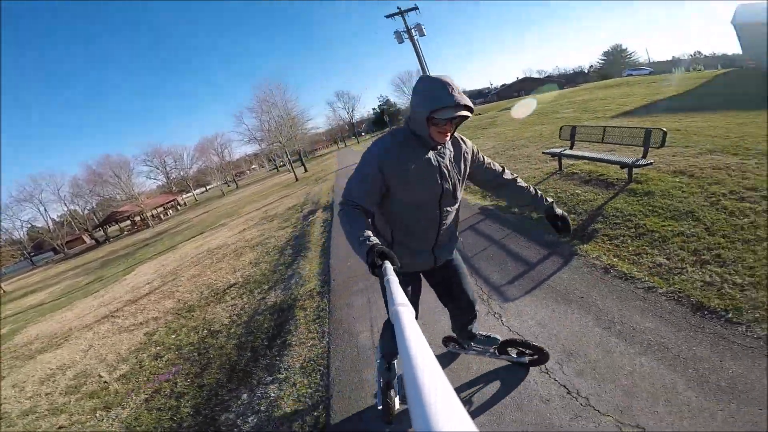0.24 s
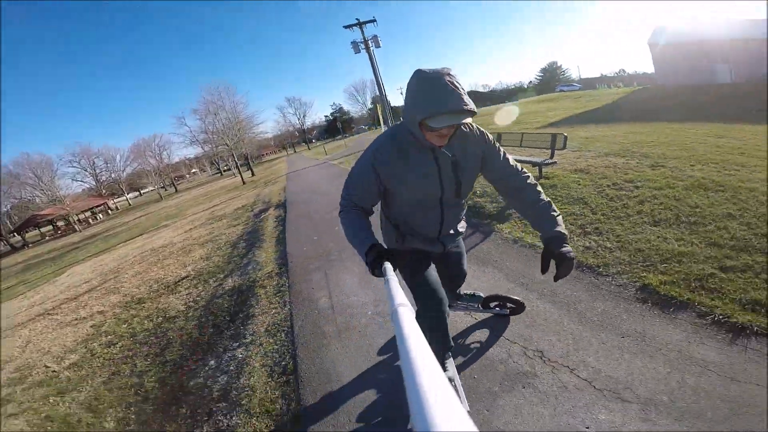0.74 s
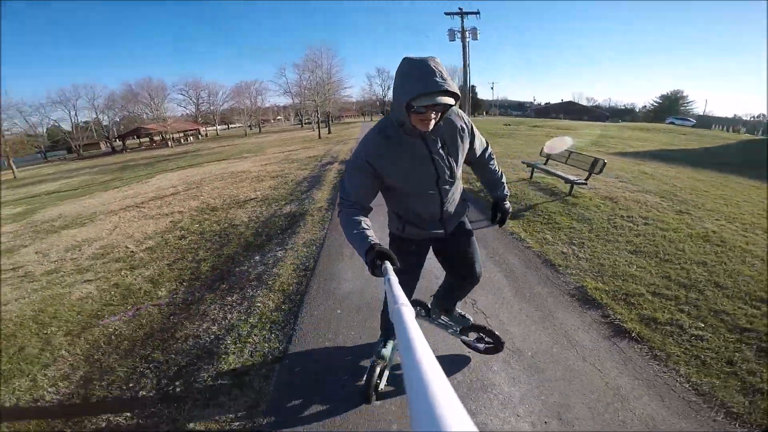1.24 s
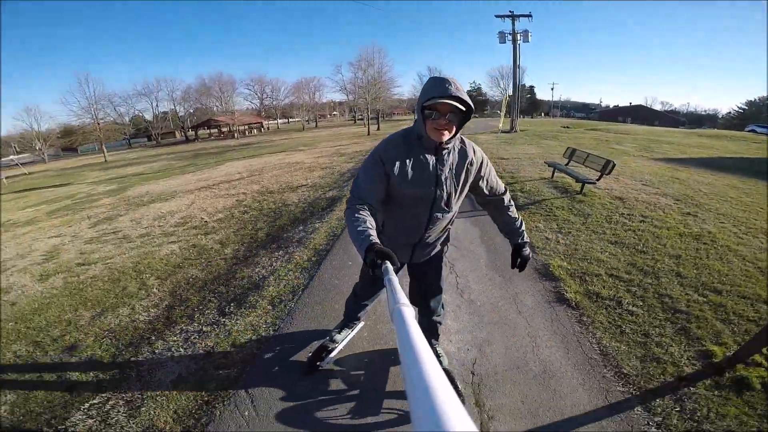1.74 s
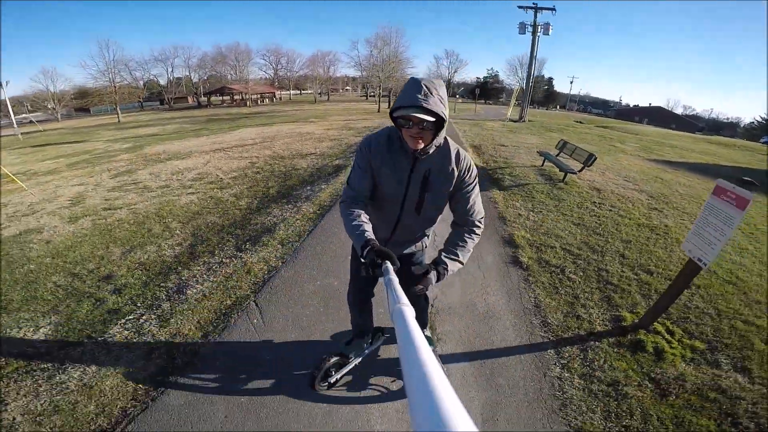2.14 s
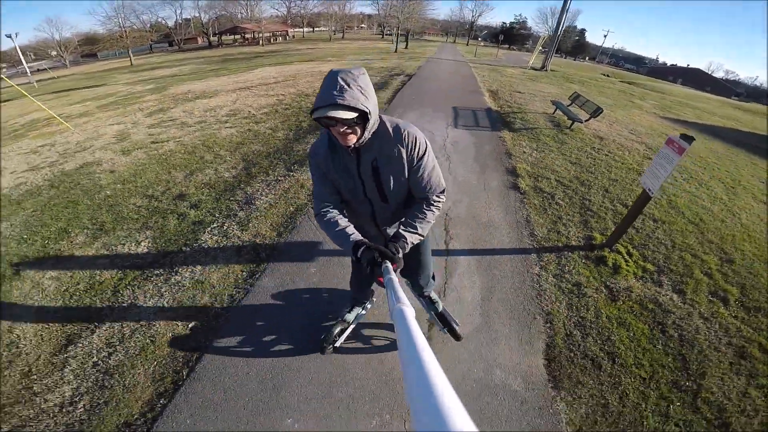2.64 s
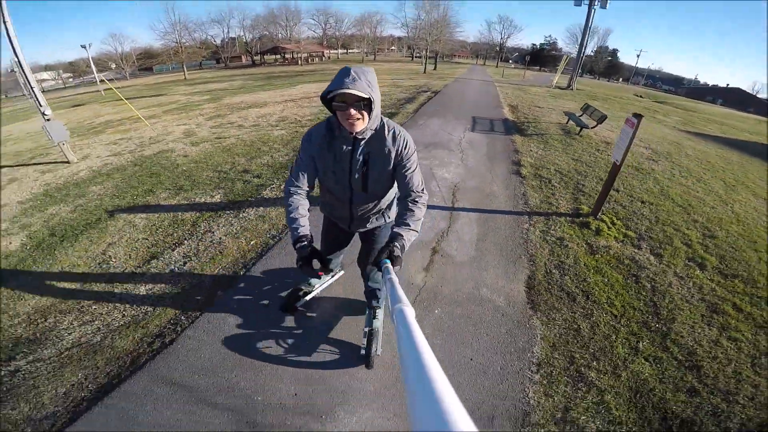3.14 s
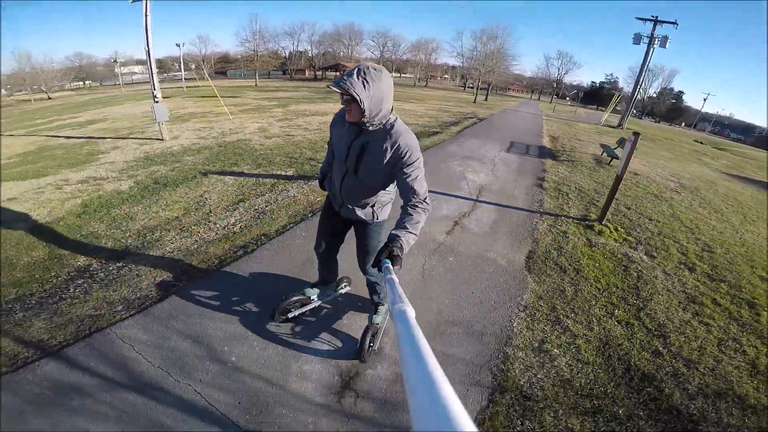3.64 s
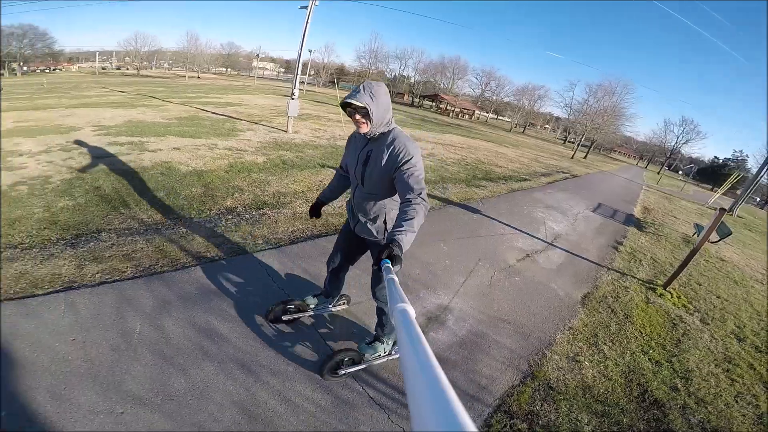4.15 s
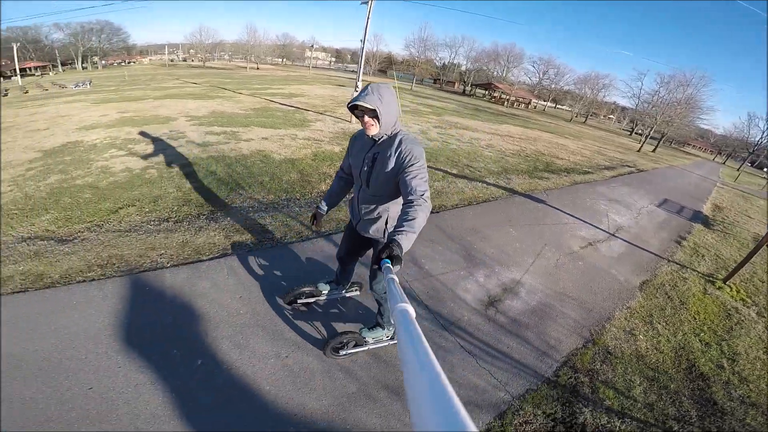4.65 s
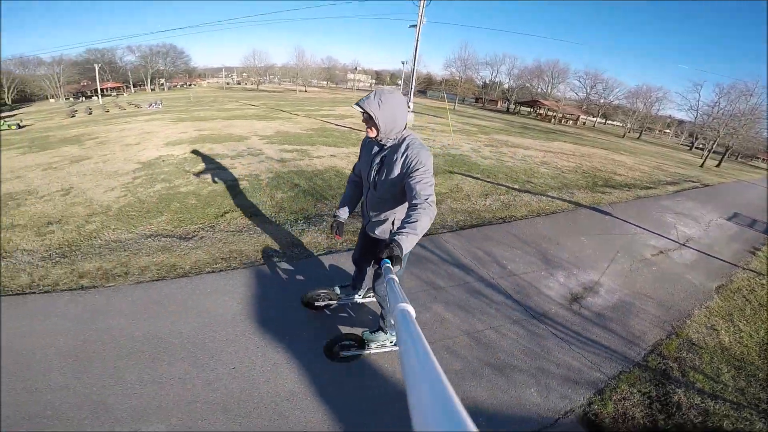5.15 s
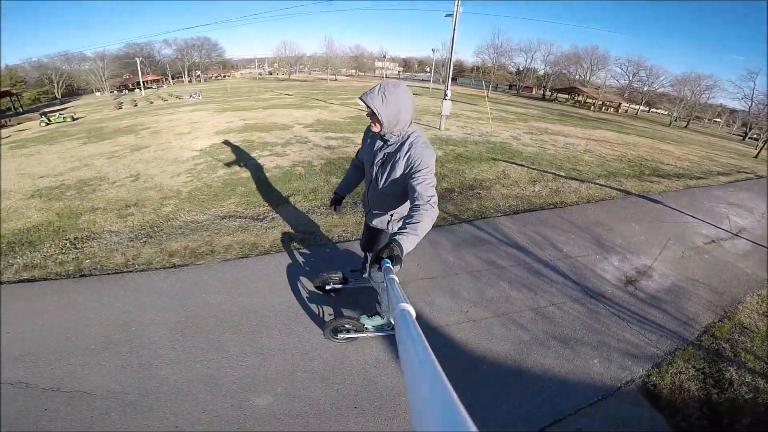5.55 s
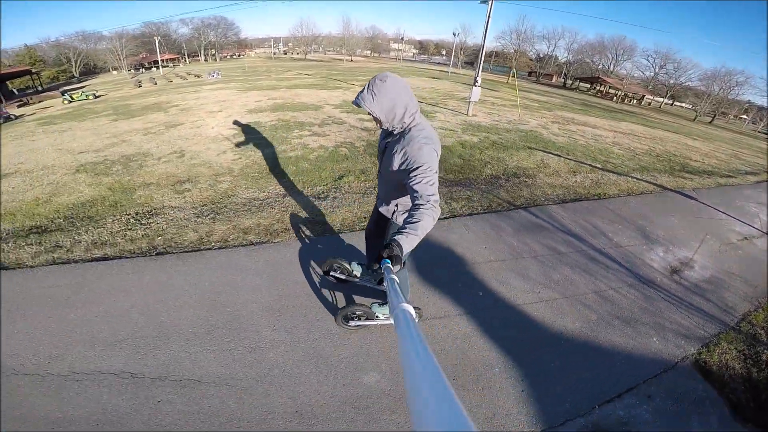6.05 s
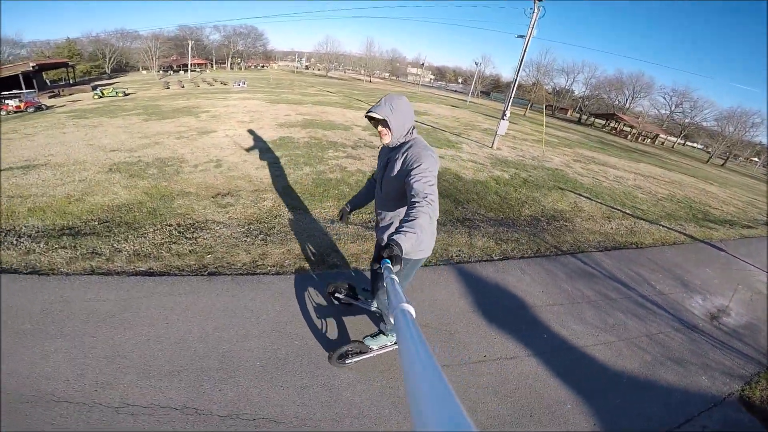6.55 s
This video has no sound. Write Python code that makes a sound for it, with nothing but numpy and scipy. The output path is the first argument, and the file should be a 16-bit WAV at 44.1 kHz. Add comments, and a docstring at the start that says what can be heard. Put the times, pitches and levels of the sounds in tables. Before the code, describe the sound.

Large inline skate wheels roll on an asphalt path with a grainy roar and soft hiss. Low wind buffets and a shuddering pole dominate underneath. Small stones snap throughout. Hard clacks with scuffs and rattles come early, again with a heavy jolt past two seconds, then near four and six. A glove rasps on the pole midway; fabric swishes near the end. Close microphone on a long pole, open air, no echo.

```python
"""An asphalt path in the open air: a skater on big-wheeled inline skates, with a microphone on a long pole.
Wind is low noise in shifting lumps, and the shuddering pole adds a swaying note.
The wheels roar and hiss as grainy noise, snap stones as short bursts, and faintly squeak and hum as tones.
Skates clack, thump, rattle and scuff as struck or slipping noise with rings.
Midway a glove rasps along the pole; near the end a jacket swishes. Both are shaped noise."""
import sys
import numpy as np
from scipy import signal
from scipy.fft import rfft, irfft
from scipy.io import wavfile
from scipy.ndimage import uniform_filter1d, map_coordinates

SR = 44100
rng = np.random.default_rng(int(sys.argv[2]) if len(sys.argv) > 2 else 0)


def bounce(signal):
    """Save signal as a 16-bit WAV file at the path given by the first command-line argument."""
    frames = np.transpose(np.atleast_2d(signal))
    limited = np.clip(frames, -1, 1)
    pcm = np.round(limited * 32767).astype(np.int16)
    wavfile.write(sys.argv[1], SR, pcm)


N = 299880  # length in samples
TIME = np.arange(N) / SR  # seconds

# Levels in the tables are relative unless called a peak: the functions add their own trims.
# Tone colours of the noises: pitch_hz, level_db
SHUDDER_COLOUR = [(10, -36), (18, -22), (28, 2.5), (38, -6.5), (47, 2.5), (56, 6), (75, -4.5), (100, -16),
                  (150, -33)]
BUFFET_COLOUR = [(40, -19), (70, -1.5), (100, 4.5), (125, 2.5), (160, -7.5), (200, -12), (250, -24.5),
                 (400, -69)]
EDDY_COLOUR = [(160, 1), (205, 4.5), (260, 1.5), (340, -7.5), (430, -10), (600, -22), (900, -32.5),
               (1500, -57), (4000, -51.5)]
ROAR_COLOUR = [(300, 8.5), (600, 3), (850, 3.5), (1300, -3.5), (2000, -11), (3000, -39), (6000, -29)]
HISS_COLOUR = [(1060, -29), (1800, -4.5), (2380, -3.5), (2570, 0.5), (2880, -4.5), (3540, -2), (4000, -6.5),
               (4560, -9.5), (5240, -7.5), (6230, -5.5), (8160, -6), (9530, -6), (11200, -14.5),
               (12600, -16), (14300, -30)]
STONE_COLOUR = [(600, -45), (1500, 0.5), (2600, 4), (4000, 3), (6500, -3.5), (7800, -13.5), (10000, -11),
                (14000, -19)]
CLACK_COLOUR = [(300, -5), (620, 2), (1080, 9), (1400, 3.5), (1700, 7), (2250, 4.5), (2660, 5.5),
                (3100, -4.5), (4400, 2.5), (5900, 0), (7400, -11), (8700, -8.5), (9800, -10), (10900, -24),
                (12200, -15), (14300, -33)]
SCUFF_COLOUR = [(350, -40), (600, 4), (850, 17.5), (1200, 2), (1500, 10.5), (2050, 2.5), (2700, 9.5),
                (3200, 6), (4100, 6), (5400, 0), (6300, 4), (8000, -7), (9700, -6), (11000, -29),
                (12500, -24), (14000, -40)]
GLOVE_COLOUR = [(500, -4), (1000, -9), (1250, -6.5), (1520, -0.5), (1800, -17.5), (2050, -13), (2350, -17),
                (2700, -19), (3500, -39), (6000, -29), (10000, -50)]  # strongest near 1.5 kHz, where the pole rings
JACKET_COLOUR = [(2000, -3.5), (4000, -7), (5800, -4), (7000, -1), (7800, -5), (12000, -15)]
# How alike left and right are: pitch_hz, likeness (-1 to 1)
LIKENESS = [(300, 0.26), (800, -0.48), (1500, -0.11), (2700, 0.7), (6400, 0.66), (8500, -0.49),
            (12000, 0.18)]
# How much louder left is than right: pitch_hz, left_minus_right_db
LEFT_LEAN = [(300, 2.5), (1000, -0.5), (2500, -1), (6400, 0.5), (7400, 3), (8800, -6.5), (10000, -3),
             (13000, -0.5)]

# Airflow over the microphone: time_s, shudder_db, buffet_db, eddies_db
AIRFLOW = [(0, -26.5, -22.5, -33.5), (0.17, -18.5, -21.5, -39), (0.33, -26, -35.5, -42),
           (0.58, -16.5, -24, -44.5), (1.1, -21, -30, -44.5), (1.55, -19.5, -25, -37),
           (1.9, -17.5, -20, -37.5), (2.42, -23.5, -26, -33), (2.85, -20.5, -22, -40.5),
           (3.45, -18.5, -33, -44.5), (3.6, -27, -24, -44), (3.87, -22, -21, -40), (4.2, -17, -28, -44.5),
           (4.72, -22, -22, -31), (5.5, -21, -27, -35), (5.8, -25, -22, -24.5), (6.27, -16.5, -23.5, -27.5),
           (6.45, -21, -27, -34), (6.8, -18, -26, -36.5)]
# Wind on the two sides as the skater turns: time_s, left_minus_right_db
WIND_SIDE = [(0, -8.5), (2.2, -12.5), (3.8, -9), (4.5, -2.5), (5.4, -0.5), (5.9, -7), (6.8, -12)]
# Puffs of air as the pole swings: middle_s, length_s, buffet_db, eddies_db
GUSTS = [(0.538, 0.12, -17.5, -32.5), (0.741, 0.13, -18, -31), (0.993, 0.16, -17.5, -37.5),
         (1.354, 0.15, -17, -37.5), (1.557, 0.11, -32, -30.5), (1.736, 0.08, -18.5, -46),
         (1.98, 0.15, -20.5, -56), (2.322, 0.17, -16, -22), (2.54, 0.065, -19.5, -35),
         (2.718, 0.17, -14, -32.5), (2.999, 0.037, -16, -40), (3.889, 0.043, -17.5, -43),
         (4.056, 0.06, -31, -27), (4.484, 0.08, -20.5, -39), (4.67, 0.14, -31, -28.5),
         (5.219, 0.041, -23, -26.5), (5.996, 0.07, -29.5, -27), (6.266, 0.07, -23, -21)]
# Brief wind changes, mostly dips, as the pole reverses its swing: middle_s, length_s, change_db
LULLS = [(0.4, 0.074, -3), (1.207, 0.1, 1.5), (2.392, 0.093, -4.5), (2.616, 0.047, -10), (2.831, 0.1, -5),
         (3.44, 0.33, -4.5), (5.58, 0.15, 0)]
# The pole's bending note follows the grip: time_s, pitch_hz, note_over_noise_db
POLE_NOTE = [(0, 48.9, -7.5), (0.7, 47.18, 9), (2.4, 48.5, 12.5), (3.402, 39.1, 1), (4.7, 40.35, -9.5),
             (5.9, 39.97, -7), (6.5, 42.34, 9)]
# Wheels on asphalt: time_s, roar_db, hiss_db
WHEELS = [(0, -46, -49), (0.35, -48, -54.5), (1.9, -46.5, -52.5), (2.35, -46.5, -48), (2.55, -52, -59),
          (3.02, -51.5, -58), (3.3, -51.5, -55), (3.799, -41.5, -53.5), (4.1, -44.5, -51.5),
          (4.6, -45.5, -53.5), (5.8, -48, -56), (6.8, -47.5, -56)]
# Larger stones snap under a wheel: start_s, level_db, bright_db
LARGE_STONES = [(0.811, -27, -6), (0.9179, -29, -9), (1.46, -39, -13), (1.5184, -40, -40),
                (1.578, -35, -32), (1.604, -31, -6), (1.643, -41, -20), (1.769, -36, -10),
                (1.83, -38.5, -7), (1.9556, -34, -10), (2.081, -35.5, -28), (2.2603, -28.5, -17),
                (2.389, -30, -7), (2.495, -25, -5), (3.3759, -29.5, -22), (3.476, -39, -20),
                (3.5009, -32, -33), (3.642, -37.5, -18), (3.7125, -38, -25), (3.787, -35, -27),
                (3.946, -30, -20), (3.973, -39, -16), (4.0253, -31.5, -33), (4.039, -35.5, -21),
                (4.048, -35, -22), (4.147, -37, -26), (4.396, -36, -30), (4.42, -41, -30),
                (4.458, -38, -17), (4.572, -43, -18), (4.643, -40, -26), (4.7135, -45, -20),
                (4.728, -36.5, -24), (4.758, -43, -32), (4.774, -35, -24), (4.814, -37, -22),
                (4.8381, -29.5, -23), (4.8529, -32, -26), (5.038, -32, -18), (5.405, -43, -13),
                (5.523, -37.5, -10), (5.9763, -32.5, -23), (6.019, -37, -10), (6.041, -34.5, -10),
                (6.092, -37, -5), (6.125, -36, -18)]
# How often small stones come, most on the gritty stretch: time_s, stones_per_s
SMALL_STONE_RATE = [(0, 9.9), (2.3, 10.7), (2.55, 1), (3.1, 1), (3.6, 19), (4.7, 21.8), (5.6, 12.1),
                    (6.1, 17), (6.6, 3.02)]
# Jolts travel up the pole: start_s, pitch_hz, level_db
THUMPS = [(0.124, 63.4, -20), (2.324, 91, -7.5), (2.352, 196, -14.5), (2.529, 188, -15), (2.646, 131, -14),
          (2.738, 218, -25)]
# Skates knock on the asphalt: start_s, level_db, dull_db, bright_db, fade_60db_s, ring_db
CLACKS = [(0.127, -31, -6.5, -0.5, 0.045, -12), (0.728, -18.5, -6, -7.5, 0.068, -6),
          (0.777, -31, 14, -3, 0.096, 0), (1.045, -37.5, -4, -6.5, 0.059, -23),
          (1.603, -30, 17.5, 5, 0.25, -22), (1.719, -39.5, -5, 14, 0.043, -26),
          (2.297, -15.5, -10, -9, 0.047, -0.5), (3.246, -34, -9, 1, 0.024, -7),
          (3.815, -16.5, -4, -7, 0.059, -11), (3.862, -27.5, 12.5, 10, 0.047, -19),
          (3.889, -26, -2, 15, 0.033, -1), (3.902, -33, 0, -3, 0.099, -14),
          (4.215, -36.5, 21, -18, 0.035, -24), (4.224, -32.5, -1.5, -14, 0.018, -12),
          (4.24, -42, -4, -15, 0.04, -18), (5.327, -34.5, -8, -2, 0.011, -26),
          (5.765, -34.5, -3, -1.5, 0.038, -14), (6.146, -22, -6.5, -7.5, 0.06, -26),
          (6.156, -25.5, -6, -6.5, 0.022, -8), (6.219, -39, 0, -12, 0.053, -22)]
# Rings of the metal frame: pitch_hz, level_db, fade_60db_s
FRAME_RINGS = [(793, -5.5, 0.19), (990, -32, 0.051), (1480, -29, 0.21), (2570, -18, 0.18),
               (2666, 22.5, 0.043), (5100, -24, .03), (6300, 8, 0.029), (7700, -18, 0.023),
               (9500, -23, 0.022), (10440, -3, 0.036), (12600, -34, .025)]
# Wheels slip sideways under the skater's weight: start_s, length_s, level_db
SCUFFS = [(0.758, 0.13, -39.5), (1.502, 0.12, -51.5), (1.588, 0.11, -46), (1.697, 0.059, -44.5),
          (2.333, 0.1, -39.5), (3.096, 0.22, -51.5), (3.851, 0.072, -32.5), (4.204, 0.066, -37),
          (5.839, 0.018, -38), (6.136, 0.077, -46)]
# Hollow knocks of wheels and boots: start_s, pitch_hz, peak_db
KNOCKS = [(0.776, 856, -19), (1.045, 1490, -43), (1.516, 1400, -34.5), (1.641, 1204, -43),
          (2.245, 1540, -31), (2.292, 1090, -17), (2.322, 1530, -23.5), (2.642, 1370, -30),
          (2.662, 1650, -35), (2.684, 2180, -39), (2.721, 1540, -42), (3.863, 784, -25.5),
          (4.222, 907, -23), (5.841, 2090, -37.5), (5.851, 1980, -44), (6.22, 1900, -47)]
# Wheels chatter in their frame after a hard landing: start_s, level_db, ping_hz
RATTLES = [(0.786, -28, 6500), (0.820, -26, 6800), (0.825, -28, 7600), (0.849, -30, 7500),
           (0.861, -36, 7300), (0.877, -39, 7700), (2.35, -27.5, 5800), (2.355, -28.5, 6370),
           (2.373, -30, 4900), (2.389, -31, 6500), (2.418, -32, 6500), (2.429, -42, 5000),
           (2.493, -40.5, 8100), (3.867, -36, 5400), (3.884, -37, 4000), (3.892, -29, 4500),
           (3.913, -43, 4100)]
# A glove slides on the pole: start_s, length_s, level_db
GLOVE_SLIDES = [(2.205, 0.42, -37.5), (2.288, 0.15, -30), (2.488, 0.076, -40.5), (2.641, 0.15, -34.5),
                (3.125, 0.18, -39.5)]
# Thin whistles, one inner table each: time_s, pitch_hz, level_db
SQUEAKS = [
    [(2.945, 5070, -66), (2.972, 5550, -56), (3.005, 5150, -59)],
    [(3.04, 8500, -62), (3.075, 9400, -57), (3.11, 9570, -51), (3.19, 8900, -49.5), (3.245, 8060, -50)],
    [(3.785, 5550, -47), (3.815, 5200, -40)],
    [(3.92, 9260, -63), (3.99, 8950, -52.5), (4.035, 8550, -45), (4.085, 9050, -51.5), (4.11, 8900, -49),
     (4.135, 8500, -68)],
]
# Random pitch jitter, one value for each whistle: jitter_hz
SQUEAK_JITTER = [210, 125, 240, 110]
# Hum of the rolling wheels: time_s, pitch_hz, level_db
HUM = [(3.099, 227.8, -61), (3.498, 246, -47.5), (3.9, 266, -46), (4.299, 281.5, -43), (4.6, 284, -63)]
# Tones that make up the hum: pitch_ratio, level_db
HUM_PARTIALS = [(1, -2), (1.45, -16), (1.63, -16), (1.8, -15)]
# The jacket swishes as the body twists: time_s, level_db
SWISH = [(6.12, -67), (6.26, -56), (6.4, -53), (6.47, -56), (6.52, -68)]

FLUTTER_DB, FLUTTER_PER_S = 1.8, 12  # random flutter of the airflow
LOAD_DB, LOAD_S = 2.5, 0.19  # a skate taking the weight rolls louder for a moment
STONE_DB, STONE_SPREAD_DB, STONE_BRIGHT_DB = -44, 2.2, -20  # small stones
STONE_BODY_HZ, STONE_BODY_DB, STONE_BODY_Q = 1750, -10.5, 4  # a stone's own knock
THUMP_RISE_S, THUMP_T60_S, THUMP_LEAN_DB = 0.0043, .11, 6  # T60: time to fade by 60 dB
CLACK_RISE_S = 0.00099
CRACK, CRACK_AT_S = 9, .0015  # full contact: height over the clatter, time after first touch
SCUFF_ATTACK_S, SCUFF_FADE_DB = .025, 13
KNOCK_RISE_S, KNOCK_T60_S, KNOCK_WIDTH = 0.0033, 0.058, 1.2  # width: pitch ratio either way
RATTLE_DULL_DB, RATTLE_BRIGHT_DB, RATTLE_RING_DB = -7.5, 1, -22
RATTLE_T60_S, RATTLE_PING_DB, RATTLE_PING_Q = .042, -3, 14
GLOVE_ATTACK_S, GLOVE_FADE_DB = 0.007, 24
EDGE_HZ = 14700  # upper limit of the microphone


def amp(db):
    """Turns decibels into a gain."""
    return 10 ** (np.asarray(db) / 20)


def unit(x):
    """Scales a sound to an average (rms) strength of 1."""
    return x / np.sqrt(np.mean(x ** 2) + 1e-20)


def read(points, hz):
    """Reads a table between its points on a log-frequency axis."""
    f, value = np.transpose(points)
    return np.interp(np.log(hz + 1), np.log(f + 1), value)


def add(mix, s, sound):
    """Mixes a stereo sound in at time s."""
    part = mix[:, max(round(s * SR), 0):][:, :sound.shape[1]]
    part += sound[:, :part.shape[1]]


def colour(x, spectrum):
    """Filters by a tone colour that falls away beyond its last point."""
    hz = np.fft.rfftfreq(x.shape[-1], 1 / SR)
    skirt = 1 / np.sqrt(1 + (hz / (2 * spectrum[-1][0])) ** 8)
    return irfft(rfft(x) * amp(read(spectrum, hz)) * skirt, x.shape[-1])


def ports(pair):
    """Blends two unrelated signals into the left and right that the two microphone ports hear."""
    shared, opposed = rfft(pair)
    hz = np.fft.rfftfreq(pair.shape[1], 1 / SR)
    same = np.clip(read(LIKENESS, hz), -1, 1)
    mid = shared * np.sqrt((1 + same) / 2)
    side = opposed * np.sqrt((1 - same) / 2)
    lean = amp(read(LEFT_LEAN, hz) / 2)
    return irfft(np.array([(mid + side) * lean, (mid - side) / lean]), pair.shape[1])


def drift(per_s, size=N):
    """Wanders at random, with an average (rms) strength near 1, by joining chance points."""
    knots = rng.standard_normal(size // 20 + 4)
    place = np.arange(size) * min(per_s / SR, 1 / 20)
    return map_coordinates(knots, [place], order=1) * np.sqrt(3 / 2)


def grainy(grain_db, per_s):
    """Makes stereo noise whose strength wanders from grain to grain."""
    return ports(rng.standard_normal((2, N)) * amp(grain_db * drift(per_s)))


def strokes(tables):
    """Gain of a sound that lasts only for its strokes."""
    gain = np.zeros(N)
    for rows in tables:
        s, db = np.transpose(rows)
        gain += np.interp(TIME, s, amp(db), 0, 0)
    return uniform_filter1d(gain, size=400)


def swell(middle, length):
    """A smooth rise to 1 and fall."""
    return np.cos(np.pi * np.clip((TIME - middle) / length, -.5, .5))


def slides(rows, attack_s, fade_db):
    """Gain of slides that bite quickly and fade until they let go."""
    gain = np.zeros(N)
    for s, length, db in rows:
        t = np.clip(TIME - s, 0, length)
        gain += np.minimum(t / attack_s, 1) * amp(db - fade_db * t / length) * (t < length)
    return uniform_filter1d(gain, size=300)


def uneven(x, depth_db):
    """Gives each struck spot its own chance set of stronger and weaker pitches."""
    hz = np.geomspace(500, 14000, 36)
    return colour(x, np.transpose([hz, depth_db * rng.standard_normal(len(hz))]))


def turbulence(spectrum, same, lumpy_db, size):
    """Low noise, partly shared by the ports, whose energy gathers in shifting lumps."""
    shared, *own = rng.standard_normal((3, N))
    noise = np.sqrt(same) * shared + np.sqrt(1 - same) * np.array(own)
    z = signal.stft(noise, nperseg=2048)[2]
    # the lumps are smoothed across pitch, then across time
    lumps = uniform_filter1d(rng.standard_normal(z.shape[1:]), size=2, axis=0)
    lumps = unit(uniform_filter1d(lumps, size=4, axis=1))
    x = colour(signal.istft(z * amp(lumpy_db * lumps))[1][:, :N], spectrum)
    # even out the running strength
    return x / np.sqrt(uniform_filter1d(x ** 2, size=size) + 1e-20)


def pole():
    """Road shocks shake the pole broadly and keep its bending note swaying."""
    s, hz, share_db = np.transpose(POLE_NOTE)
    turns = np.cumsum(np.interp(TIME, s, hz) * (1 + 0.086 * drift(22))) / SR
    note = unit(np.sin(2 * np.pi * turns) * (1 + 0.39 * drift(14)))
    share = amp(np.interp(TIME, s, share_db))
    shaking = turbulence(SHUDDER_COLOUR, same=0.38, lumpy_db=6.5, size=3000)
    return (share * note + shaking) / np.sqrt(1 + share ** 2)


def wind():
    """The pole shudders and eddies hit the ports, in a fluttering flow with gusts."""
    s, *columns = np.transpose(AIRFLOW)
    shudder, buffet, eddies = (
        amp(np.interp(TIME, s, c) + FLUTTER_DB * drift(FLUTTER_PER_S)) for c in columns)
    for middle, length, buffet_db, eddy_db in GUSTS:
        puff = swell(middle, length)
        buffet = np.hypot(buffet, amp(buffet_db) * puff)
        eddies = np.hypot(eddies, amp(eddy_db) * puff)
    side_db = np.interp(TIME, *np.transpose(WIND_SIDE))
    sides = amp(np.array([side_db, -side_db]) / 2)
    sides /= np.sqrt(np.mean(sides ** 2, axis=0))
    shudder = shudder * amp(0.45) * pole()
    buffet = buffet * amp(0.78) * turbulence(BUFFET_COLOUR, same=0.33, lumpy_db=4.0, size=1600)
    eddies = eddies * amp(1.5) * turbulence(EDDY_COLOUR, same=0.02, lumpy_db=2.0, size=2000)
    lull_db = sum(db * swell(middle, length) for middle, length, db in LULLS)
    return sides * amp(lull_db) * (shudder + buffet + eddies)


def rolling():
    """Wheels roar and hiss over grainy asphalt and crackle on fine grit, louder around each scuff."""
    s, roar_db, hiss_db = np.transpose(WHEELS)
    load = np.max([swell(start + length / 2, LOAD_S) for start, length, db in SCUFFS], axis=0)
    roar = amp(np.interp(TIME, s, roar_db) + 2.5) * unit(colour(grainy(1.0, 90), ROAR_COLOUR))
    hiss = amp(-3.0) * unit(colour(grainy(1.5, 140), HISS_COLOUR))
    # about 110 specks of grit a second, of chance sizes
    sizes = amp(4 * np.minimum(rng.exponential(1, N), 2)) * (rng.random(N) < 110 / SR)
    specks = ports(sizes * rng.choice([-1, 1], (2, N)))
    grit = amp(-15.0) * unit(colour(specks, STONE_COLOUR))
    return amp(LOAD_DB * load) * (roar + amp(np.interp(TIME, s, hiss_db)) * (hiss + grit))


def small_stones(count=340):
    """Chance snaps along the path, as rows of start_s, level_db, bright_db."""
    times = (np.arange(count) + rng.random(count)) * N / SR / count
    hit = rng.random(count) < np.interp(times, *np.transpose(SMALL_STONE_RATE)) * N / SR / count
    size, tint = rng.standard_normal((2, count))
    level_db = STONE_DB + STONE_SPREAD_DB * size
    bright_db = STONE_BRIGHT_DB + 7 * tint
    return list(np.transpose([times, level_db, bright_db])[hit])


def ticks():
    """Stones snap out from under the wheels, dry and short, each with a little body of its own."""
    out, t = np.zeros((2, N)), np.arange(2048) / SR
    lead_s = .002
    after = np.maximum(t - lead_s, 0)
    for s, db, bright_db in list(LARGE_STONES) + small_stones():
        life, body_hz = 2 ** rng.uniform(-.7, .7, 2) * [.008, STONE_BODY_HZ]
        # a quick fade, with a weaker and slower one beneath
        snap = (after > 0) * (amp(-60 * after / life) + amp(-14 - 60 * after / .03))
        blow = ports(rng.standard_normal((2, len(t))) * snap)
        brightness = [(5000, 0), (8000, bright_db + 25.5), (15000, bright_db - 6)]
        sound = colour(colour(blow, STONE_COLOUR), brightness)
        body = signal.lfilter(*signal.iirpeak(body_hz, STONE_BODY_Q, fs=SR), blow)
        sound = unit(uneven(sound, 2.4)) + amp(STONE_BODY_DB) * unit(body)
        add(out, s - lead_s, amp(db - 18.0) * unit(sound))
    return out


def thumps():
    """A jolt shakes the microphone for a few slow swings, more on the left."""
    out, t = np.zeros((2, N)), np.arange(8000) / SR
    shape = np.minimum(t / THUMP_RISE_S, 1) * amp(-60 * t / THUMP_T60_S)
    lean = amp([[0], [-THUMP_LEAN_DB]])
    for s, hz, db in THUMPS:
        add(out, s, lean * amp(db) * shape / shape.max() * np.sin(2 * np.pi * hz * t))
    return out


def clack(db, dull_db, bright_db, t60, ring_db):
    """A hard crack with a short clatter behind it sets the skate frame ringing."""
    after = np.maximum(np.arange(6000) / SR - .002, 0)
    onset = 1 - np.exp(-after / CLACK_RISE_S)
    blow = onset * (amp(-60 * after / t60) + amp(-20 - 60 * after / .08))
    contact = rng.standard_normal((2, len(after))) * blow
    contact[0, np.searchsorted(after, CRACK_AT_S)] += CRACK
    crack = unit(colour(ports(contact), CLACK_COLOUR))
    ring = np.zeros(len(after))
    for hz, level, life in FRAME_RINGS:
        # each blow shifts the strength and pitch of each ring a little
        fade = amp(level + 3.5 * rng.standard_normal() - 60 * after / life)
        ring += fade * np.sin(2 * np.pi * hz * after * (1 + .011 * rng.standard_normal()))
    ring *= onset
    sound = uneven(crack + amp(ring_db) * unit(ring), 1.7)
    # the spot that is struck shares the blow between dull, middle and bright bands
    shares = [(500, 1900, dull_db - 1.5), (2000, 5000, -4), (5000, 15000, bright_db)]
    mixed = 0
    for low, high, share_db in shares:
        band = signal.butter(2, [low, high], "band", fs=SR, output="sos")
        mixed = mixed + amp(share_db) * unit(signal.sosfilt(band, sound))
    return amp(db - 15.0) * unit(mixed)


def clacks():
    """Skates knock down on the asphalt, each blow a crack with a frame ring."""
    out, lead_s = np.zeros((2, N)), .0025
    for s, *blow in CLACKS:
        add(out, s - lead_s, clack(*blow))
    return out


def scuffs():
    """Wheels judder sideways under the weight: a rasp and a rattle of short, separate slips."""
    # about 170 slips a second, of chance sizes, each dying away within milliseconds
    slips = amp(3.5 * np.minimum(rng.exponential(1, N), 2)) * (rng.random(N) < 170 / SR)
    bite = signal.lfilter([1], [1, -np.exp(-1 / (.0012 * SR))], slips)
    rattle = unit(ports(rng.standard_normal((2, N)) * bite))
    rasp = amp(-6) * unit(grainy(3.5, 160))
    gain = amp(6.5) * slides(SCUFFS, SCUFF_ATTACK_S, SCUFF_FADE_DB)
    return gain * unit(colour(rattle + rasp, SCUFF_COLOUR))


def knocks():
    """A blunt blow sets one short, noisy resonance of a wheel or boot going."""
    out, t = np.zeros((2, N)), np.arange(4000) / SR
    blow = np.minimum(t / KNOCK_RISE_S, 1) * amp(-60 * t / KNOCK_T60_S)
    for s, hz, db in KNOCKS:
        body = signal.butter(1, [hz / KNOCK_WIDTH, hz * KNOCK_WIDTH], "band", fs=SR, output="sos")
        noise = ports(rng.standard_normal((2, len(t)))) * blow
        sound = signal.sosfilt(np.vstack([body, body]), noise)
        add(out, s, amp(db) * sound / abs(sound).max())
    return out


def rattles():
    """Loose wheels chatter: small, bright clacks, each with a ping of its own."""
    out, lead_s = np.zeros((2, N)), .0025
    for s, db, hz in RATTLES:
        knock = clack(db, RATTLE_DULL_DB, RATTLE_BRIGHT_DB, RATTLE_T60_S, RATTLE_RING_DB)
        ping = signal.lfilter(*signal.iirpeak(hz, RATTLE_PING_Q, fs=SR), knock)
        ping = amp(RATTLE_PING_DB) * knock.std() * unit(ping)
        add(out, s - lead_s, amp(-7.0) * (knock + ping))
    return out


def glove():
    """A glove drags along the pole, which carries the rasp to the microphone."""
    gain = amp(0.5) * slides(GLOVE_SLIDES, GLOVE_ATTACK_S, GLOVE_FADE_DB)
    return gain * unit(colour(grainy(2.2, 200), GLOVE_COLOUR))


def squeaks():
    """Thin whistles of a slipping wheel, rough and sputtering; the low ones are the hoarsest."""
    out = np.zeros((2, N))
    for rows, jitter_hz in zip(SQUEAKS, SQUEAK_JITTER):
        s, hz, db = np.transpose(rows)
        pitch_hz = np.interp(TIME, s, hz) + jitter_hz * drift(2000) + 45 * drift(120)
        turns = np.cumsum(pitch_hz) / SR
        tone = unit(np.sin(2 * np.pi * turns) * amp(3 * drift(350) + 2.6 * drift(60)))
        out += tone * strokes([np.transpose([s, db])]) * amp([[-5], [.5]])  # stronger on the right
    return out


def hum():
    """A gently wavering hum of the spinning wheels, with fainter partials that come and go."""
    s, hz, db = np.transpose(HUM)
    turns = np.cumsum(np.interp(TIME, s, hz)) / SR
    tone = np.zeros(N)
    for ratio, level in HUM_PARTIALS:
        waver = .3 * ratio * ratio  # higher partials waver more
        wave = np.sin(2 * np.pi * ratio * turns + waver * drift(14))
        tone += amp(level) * wave * (1 + waver * drift(9))
    return amp(3) * unit(tone) * strokes([np.transpose([s, db])])


def jacket():
    """Smooth shell fabric slides over itself with a grainy swish."""
    return strokes([SWISH]) * unit(colour(grainy(2.3, 120), JACKET_COLOUR))


def scene():
    """Everything in the open air, with no room."""
    ride = wind() + rolling() + ticks()
    landings = thumps() + clacks() + scuffs() + knocks() + rattles()
    return ride + landings + glove() + squeaks() + hum() + jacket()


def record(dry):
    """The microphone rounds off the strongest peaks, then limits the highest pitches."""
    knee = .6
    over = np.maximum(abs(dry) - knee, 0)
    soft = np.clip(dry, -knee, knee) + np.sign(dry) * .3 * np.tanh(over / .3)
    lowpass = signal.firwin(127, EDGE_HZ, window=("kaiser", 9), fs=SR)
    return signal.oaconvolve(soft, lowpass[None], "same")


dry = scene()
out = record(dry)
bounce(out)
```